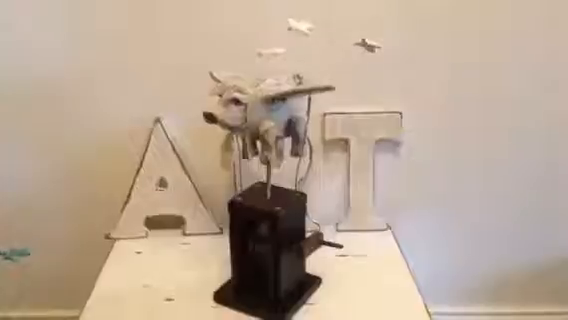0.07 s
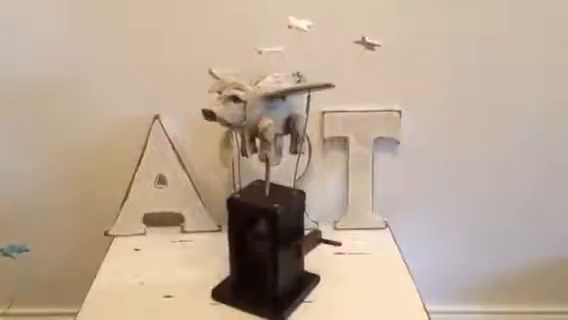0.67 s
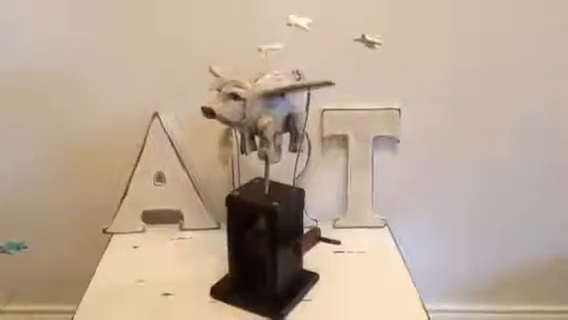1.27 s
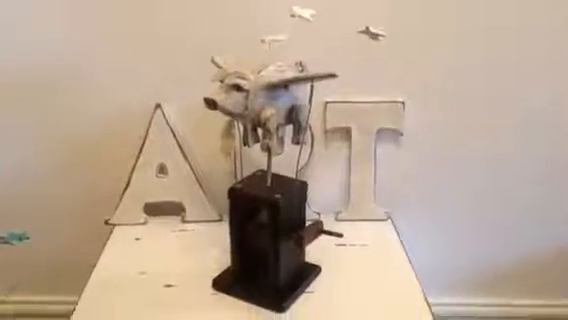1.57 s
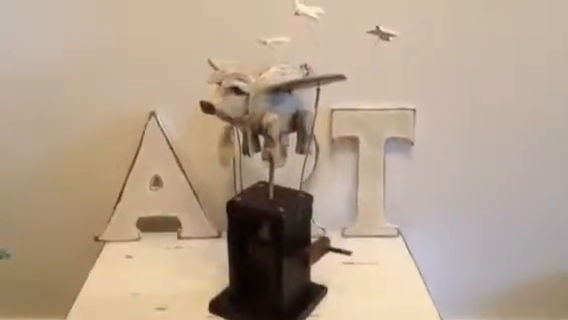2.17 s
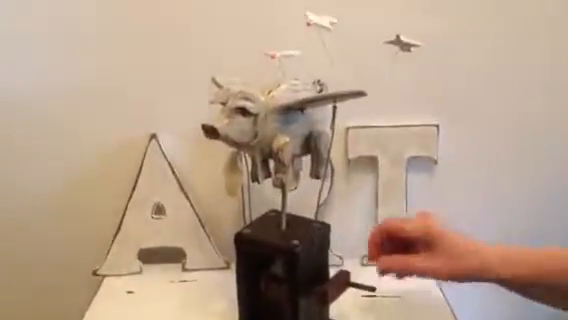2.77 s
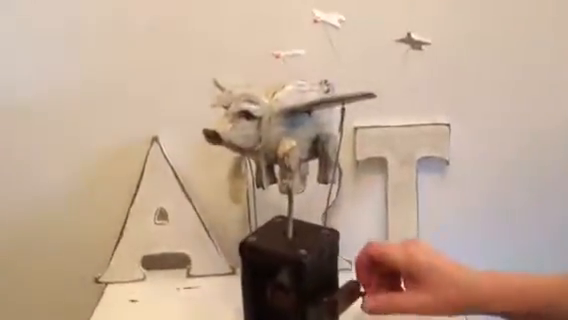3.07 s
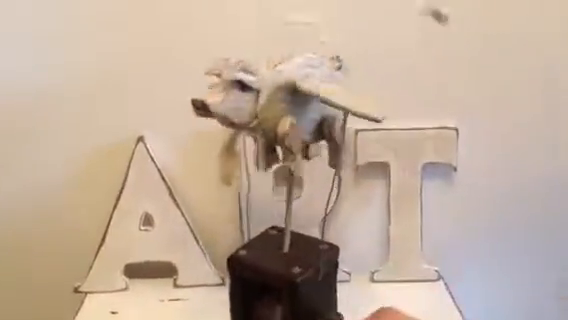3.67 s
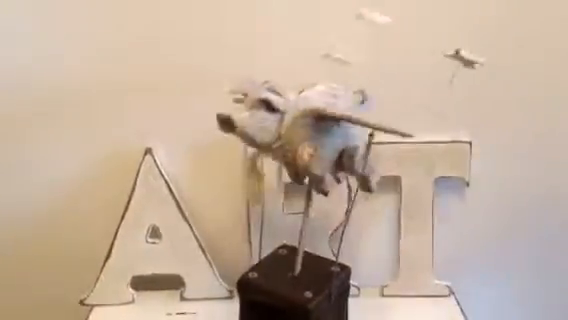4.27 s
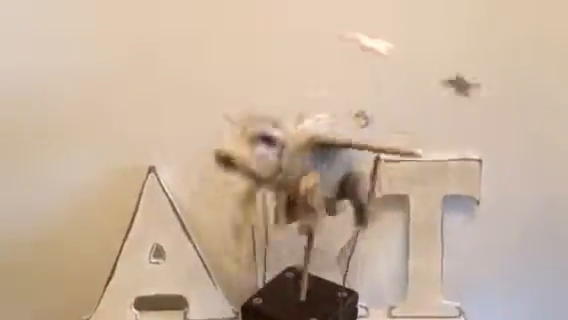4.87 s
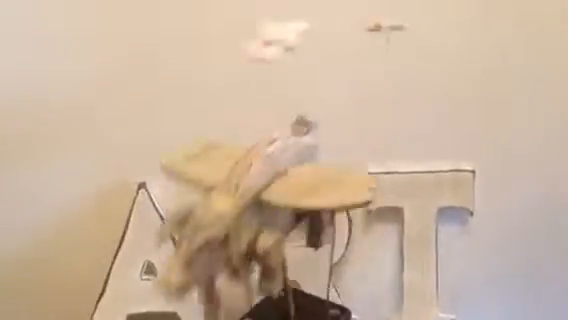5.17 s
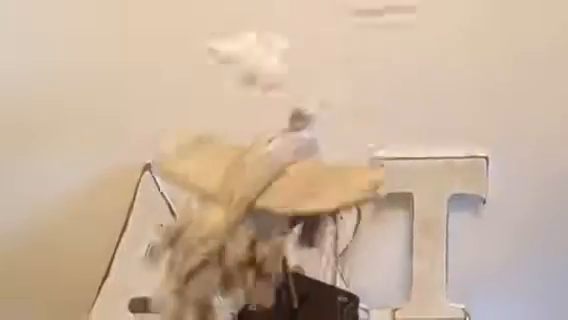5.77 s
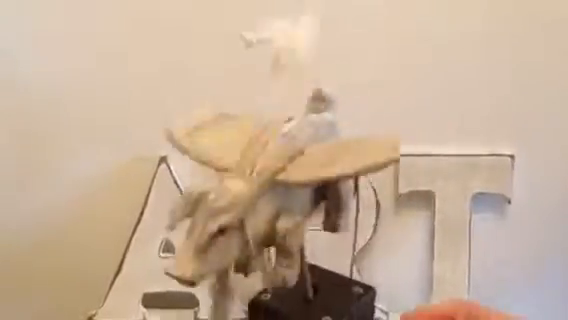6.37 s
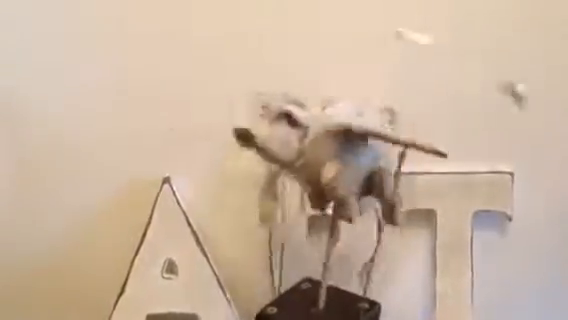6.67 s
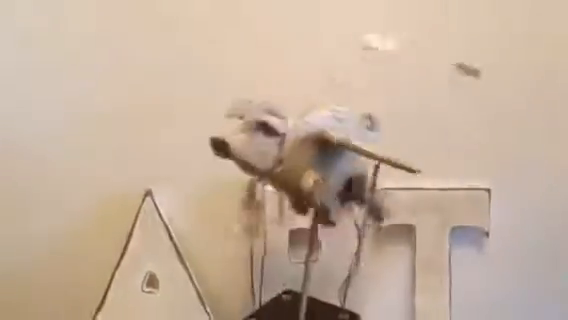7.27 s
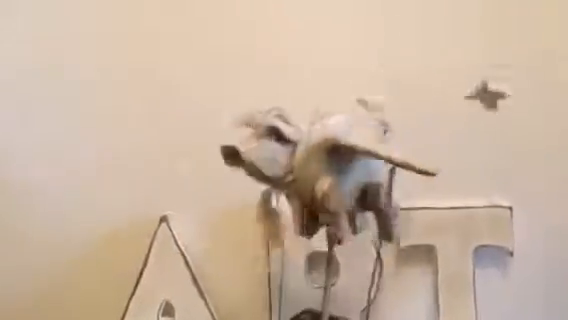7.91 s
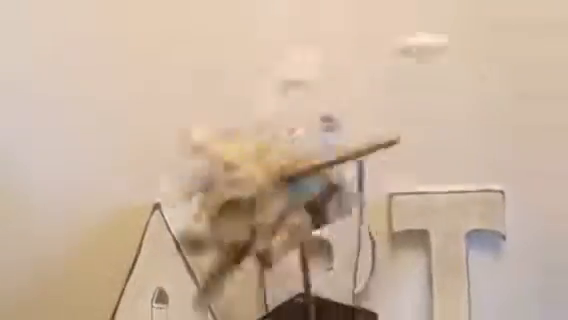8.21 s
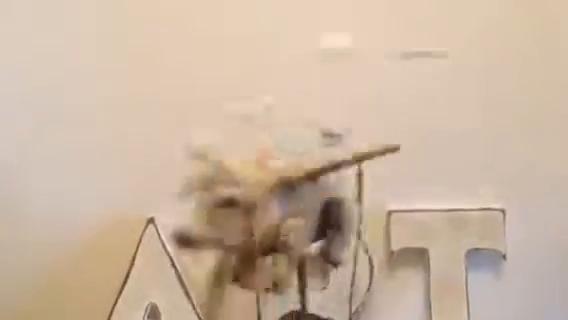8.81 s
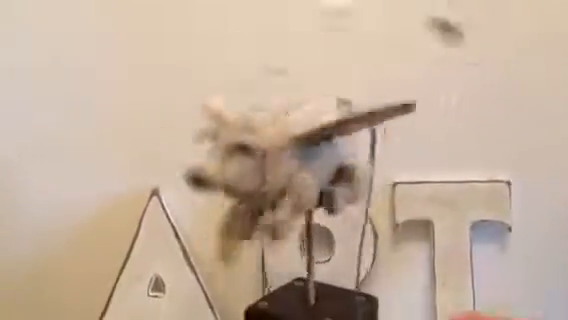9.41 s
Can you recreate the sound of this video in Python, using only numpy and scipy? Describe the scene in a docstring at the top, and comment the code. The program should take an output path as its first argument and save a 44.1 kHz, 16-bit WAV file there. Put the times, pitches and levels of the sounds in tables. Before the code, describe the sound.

A hand-cranked wooden toy scrapes into motion, then thumps, clacks and rattles in a steady, loose rhythm in a quiet room.

```python
"""A hand-cranked wooden flying pig

The toy stands on a box on a table in a quiet room. Something clinks far off, someone shifts closer,
and a sleeve rustles as the hand reaches for the crank. Each turn tips, drops and lifts the figure:
the box thumps on the table, the shaft scrapes in its wooden bearings, a dry pivot squeaks, and the
push rods and wires clack, tick and snap in their holes."""
import sys
import numpy as np
from scipy import signal
from scipy.fft import rfft, irfft, next_fast_len
from scipy.io import wavfile
from scipy.ndimage import map_coordinates

SR = 44100
rng = np.random.default_rng(int(sys.argv[2]) if len(sys.argv) > 2 else 0)


def digitize_waveform(pressure):
    """Quantize a signal to 16-bit integers and store it at the path in sys.argv[1].

    Rows of a 2-D input are taken as channels; values are limited to [-1, 1].
    """
    field = np.atleast_2d(pressure).T
    bounded = np.clip(field, -1, 1)
    quanta = np.round(bounded * 32767).astype(np.int16)
    wavfile.write(sys.argv[1], SR, quanta)


N = 416744
NOW = np.arange(N) / SR  # seconds since the scene began
RING = np.arange(SR // 3) / SR  # seconds since a blow


# the tones the box rings with on the table: pitch_hz, level_db, fade_s
BOX_TONES = [(77, 0, 0.33), (103.3, 5, 0.17), (169, -21, 0.15), (177, -13, 0.42), (214.2, 3.5, 0.13),
             (280, -20, 0.33), (338, -7, 0.11), (358, 0, 0.083), (429.5, 0.5, 0.023), (456, -15, 0.023),
             (548, -12.5, 0.089), (676, -8.5, 0.068), (685, -11.5, 0.06), (909, -11.5, 0.056)]
# the figure's weight jolts the box: peak_s, level_db, pitch_hz
BOX_THUMPS = [(3.104, -53, 172), (3.174, -53.5, 158), (3.253, -48, 167), (3.376, -45.5, 165),
              (3.472, -50.5, 137), (3.563, -47, 160), (3.831, -43, 163), (3.876, -39, 156),
              (4.034, -35, 164.5), (4.094, -38, 128), (4.236, -31.5, 184), (4.558, -36.5, 148),
              (4.687, -35, 173), (4.735, -31.5, 155), (4.903, -42, 188), (5.192, -35.5, 155),
              (5.299, -30, 178), (5.334, -32.5, 169), (5.359, -33, 153), (5.494, -34, 173),
              (5.865, -27.5, 183), (5.881, -23.5, 156), (5.946, -33, 172.4), (6.021, -31.5, 171),
              (6.077, -32.5, 152), (6.348, -30.5, 153), (6.459, -20, 173.5), (6.571, -34, 206),
              (6.677, -35.5, 148), (6.867, -31, 163), (7.02, -19, 170.5), (7.063, -29.5, 172),
              (7.13, -32, 181), (7.199, -32, 165), (7.477, -34, 133), (7.563, -31, 176), (7.618, -29, 168),
              (7.804, -41.5, 160), (8.088, -34, 136), (8.215, -21.5, 180.3), (8.413, -35, 187),
              (8.63, -33.5, 157), (8.772, -28.5, 198), (8.79, -24.5, 175), (8.987, -28, 160),
              (9.237, -42.5, 165), (9.347, -29, 170), (9.37, -27, 145), (9.424, -38, 152)]

def box_thumps(rise_s=0.0087, fall_s=0.0081, sag=0.1, shudder_db=1.5, box_db=-8, octave_db=-15):
    """Each drop of the figure swells into a shudder that sags in pitch, and sets the box ringing."""
    out, t = np.zeros(N), RING - RING[-1] / 2
    for peak_s, db, hz in BOX_THUMPS:
        swell = np.exp(-np.hypot(t, .004) / np.where(t < 0, rise_s, fall_s))
        cycles = np.cumsum(hz * (1 - sag * np.tanh(t / 0.0088))) / SR
        angle = 2 * np.pi * (cycles - cycles[len(t) // 2])
        # the table pushes back one way only, which adds the octave
        shudder = np.cos(angle) + amp(octave_db) * np.cos(2 * angle)
        add(out, peak_s + t[0], amp(db + shudder_db) * peaked(swell * shudder))
        landing = ring(BOX_TONES, detune=0.0081) * fade_in(0.0015)
        add(out, peak_s - 0.0021, -amp(db + box_db) * peaked(landing))
    return out


# the tones the linked rods ring with: pitch_hz, level_db, fade_s
ROD_TONES = [(885, -11, 0.046), (1170, 11.5, 0.0048), (1595, 5.5, 0.0094), (1911, -7, 0.035),
             (2094, 0.5, 0.011), (2547, -3, 0.034), (3060, -9.5, 0.034), (3040, 0.5, 0.019),
             (3390, -8.5, 0.014), (3540, -5, 0.017), (4330, -19, 0.025)]
# the tone colour of a crack on wood: pitch_hz, level_db
CRACK_COLOUR = [(150, -18), (500, 9), (1000, -9), (1700, 17), (2250, 3), (3300, 6.5), (5000, -6),
                (8000, -11), (16000, -38)]
# the tone colour of the bright fizz of rods and wires: pitch_hz, level_db
FIZZ_COLOUR = [(2000, -16), (5000, -3), (7100, 0), (8200, -4.5), (9500, -1.5), (10400, -9), (11800, 1.5),
               (13000, -8.5), (16000, -3.5)]
# rods and wing joints knock: start_s, level_db, strongest_hz, treble_db
ROD_CLACKS = [(3.564, -46, 1480, -4), (4.044, -44, 1800, 1.5), (4.1896, -43.5, 1860, -3),
              (4.22, -33, 1940, -25), (5.0475, -41.5, 2550, -28), (5.2835, -36.5, 1520, -26),
              (5.534, -38, 2510, -9), (5.6461, -31.5, 2550, -22), (5.6994, -41, 1810, -13),
              (5.824, -34.5, 2010, -29), (5.876, -40.5, 1240, -15), (5.911, -34, 3480, -10),
              (6.069, -36.5, 890, -24), (6.1626, -43, 2160, -28), (6.3272, -28.5, 1640, -7),
              (6.4573, -34, 1340, -5), (6.4873, -32.5, 2780, -8), (6.602, -47, 2000, -22),
              (6.6128, -37, 1590, -22), (6.7045, -41.5, 3170, -26), (6.773, -34, 2610, -11),
              (6.9332, -40, 1930, -24), (6.9663, -39, 1950, -17), (6.991, -38.5, 2080, -2.5),
              (7.0106, -39.5, 3520, -26), (7.0173, -32, 1290, -28), (7.0273, -34.5, 2000, -26),
              (7.1768, -38, 2050, -31), (7.228, -38, 1890, -19), (7.2844, -36, 2550, -35),
              (7.3507, -32.5, 2540, -27), (7.5493, -42.5, 1360, -21), (7.6082, -40.5, 2180, -25),
              (7.8446, -40.5, 1270, -27), (8.159, -38, 2080, -16), (8.226, -40, 3330, -25),
              (8.4016, -38.5, 1960, -8), (8.446, -33.5, 1860, -30), (8.4913, -27.5, 2570, -35),
              (8.758, -44, 1320, -5), (8.797, -37, 1530, -25), (8.9282, -37, 2100, -13),
              (9.1406, -40, 2710, -28), (9.3092, -33, 1930, -30), (9.3268, -33, 2550, -10),
              (9.362, -32.5, 3430, -26), (9.3829, -34.5, 1210, -27)]

def rod_clacks(focus_db=9, linger=0.48, crack_db=-13, treble_db=-6, level_db=-2):
    """A rod knocks on wood with a crack and a fizz; tones hit squarely ring louder and longer."""
    out = np.zeros(N)
    tone_hz, tone_db, fade_s = np.transpose(ROD_TONES)
    for start_s, db, hz, treble in ROD_CLACKS + loose_rod_knocks():
        squarely = np.exp(-(np.log2(tone_hz / hz) / .13) ** 2)
        tones = np.transpose([tone_hz, tone_db + focus_db * squarely, fade_s * (1 + linger * squarely)])
        blow = struck(ring(tones, detune=0.0042)) + amp(crack_db) * burst(CRACK_COLOUR, 0.033)
        blow = struck(blow * fade_in(.0012))
        fizz = amp(treble + treble_db) * struck(burst(FIZZ_COLOUR, 0.035))
        add(out, start_s + 0.001064, amp(db + level_db) * (blow + fizz))
    return out


def loose_rod_knocks(per_s=7, over_scrape_db=13, spread_db=2, ceiling_db=-42, treble_db=-18):
    """Loose rods knock at random, harder when the bearings are loaded. Gives rows like ROD_CLACKS."""
    chances = rng.random((200, 4))
    scrape, rows = friction(SCRAPE), []
    span_s = NOW[-1] - FULL_SPEED_S
    for when, kept, size, pitch in chances:
        if kept < per_s * span_s / len(chances):
            start_s = FULL_SPEED_S + when * span_s
            db = min(20 * np.log10(scrape[int(start_s * SR)]) + over_scrape_db, ceiling_db)
            hz = ROD_TONES[int(pitch * len(ROD_TONES))][0]
            rows.append((start_s, db + spread_db * (2 * size - 1), hz, treble_db))
    return rows


# the tones the wire link rings with: pitch_hz, level_db, fade_s
WIRE_TONES = [(1610, 0, 0.031), (2170, 8, 0.02), (3090, 9, 0.032), (3580, 7, 0.026), (4380, 10, 0.007),
              (6300, -13, 0.11), (9340, 7, 0.0095), (9960, -22, 0.012), (10000, -16, 0.055),
              (10860, -5, 0.023), (11700, -33, .015), (14000, -3, 0.021), (16000, -12, .025)]
# the wire link catches and snaps free: start_s, level_db, treble_db
WIRE_SNAPS = [(4.3342, -27, 3.5), (4.6845, -40, -10), (5.0962, -31, -2), (5.2968, -37.5, -5),
              (5.5725, -34.5, -1.5), (8.1959, -32.5, -2)]

def wire_snaps(crack_db=-7, treble_db=5, level_db=1):
    """A wire jumps in its hole: a hard tick and a thin metallic ring."""
    out = np.zeros(N)
    is_high = np.transpose(WIRE_TONES)[0] > 6000
    for start_s, db, treble in WIRE_SNAPS:
        metal = struck(ring(WIRE_TONES, is_high * (treble + treble_db), scatter_db=4, detune=0.013))
        crack = amp(crack_db + treble + treble_db) * burst(FIZZ_COLOUR, 0.01)
        add(out, start_s + .0005, amp(db + level_db) * struck((metal + crack) * fade_in(0.00019)))
    return out


# small dry ticks, most of them from the wires: start_s, level_db, pitch_hz
WIRE_TICKS = [(2.3205, -51.5, 6900), (3.8762, -46, 6840), (4.1643, -50, 12100), (5.184, -44, 10900),
              (5.67, -48, 7100), (5.7485, -46.5, 6140), (5.9993, -44, 12300), (6.883, -45.5, 6250),
              (7.0384, -42, 12600), (7.452, -48, 6500), (7.578, -46.5, 9300), (8.08, -46, 11100),
              (9.2244, -45.5, 6400)]

def wire_ticks(fade_s=0.042, level_db=-1):
    """Light touches make short, bright bursts of noise."""
    out = np.zeros(N)
    for start_s, db, hz in WIRE_TICKS:
        colour = [(hz / 4, -16), (hz / 2, -10), (hz, 0), (hz * 2, -13)]
        add(out, start_s + 0.00092, amp(db + level_db) * peaked(burst(colour, fade_s)))
    return out


# the tone colour of wood scraping on wood: pitch_hz, level_db
SCRAPE_COLOUR = [(150, -28), (400, 6), (650, 7), (780, 2.5), (930, 8), (1150, -2.5), (1900, 2.5),
                 (2350, -0.5), (3400, -5), (4800, -13.5), (7000, -44.5), (15000, -37)]
# the tone colour of the shuddering box: pitch_hz, level_db
SHUDDER_COLOUR = [(35, -53), (70, -9), (102, -9), (120, 1), (155, 2), (190, 5), (250, -33), (345, -11.5),
                  (500, -20.5), (900, -27.5), (2000, -67)]

def crank(weight_scrape_db=-38, box_ring_db=-2, rod_ring_db=-9):
    """Shaft and rods slip in their bearings: the wood scrapes, the wires hiss and the box shudders."""
    slips, jolts = grains(per_s=2000, spread_db=3.6), grains(per_s=900, spread_db=1.5)
    rods = evened(signal.oaconvolve(slips, ring(ROD_TONES))[:N])
    wood = coloured(slips, SCRAPE_COLOUR) + amp(rod_ring_db) * rods
    wood = wandering_contact(wood, depth_db=9.5, patch_s=.018)
    wires = coloured(slips + grains(per_s=2500, spread_db=1), FIZZ_COLOUR)
    wires = wandering_contact(wires, depth_db=7, patch_s=.035)
    panels = evened(signal.oaconvolve(jolts, ring(BOX_TONES, scatter_db=4.5, detune=0.0018))[:N])
    rumble = coloured(grains(per_s=800, spread_db=-1), SHUDDER_COLOUR)
    box = evened(rumble + amp(box_ring_db) * panels)
    box *= judder(depth_db=6.5, step_s=.03)
    wood *= judder(depth_db=4, step_s=.009)
    wires *= judder(depth_db=2, step_s=.025)
    wood_level = np.hypot(friction(SCRAPE), amp(weight_scrape_db) * weight_on_bearings())
    return friction(SHUDDER) * box + wood_level * wood + friction(HISS) * wires


SHUDDER, SCRAPE, HISS = range(3)  # the three layers of the crank's sound
GRIP_S, GRIP_RISE_S, FULL_SPEED_S = 3.026, 0.042, 4.6  # the hand takes hold, then winds up to speed
# steady rubbing, one row for each layer: full_speed_db, quieter_when_slow_db
STEADY_FRICTION = [(-55.5, 9), (-64, 14), (-72, 9)]

def friction(layer):
    """How loud one layer is: steady rubbing that grows with speed, plus the strokes of each turn."""
    full_db, quieter_db = STEADY_FRICTION[layer]
    speed = np.clip((NOW - GRIP_S) / (FULL_SPEED_S - GRIP_S), 0, 1)
    held = np.clip((NOW - GRIP_S) / GRIP_RISE_S, 0, 1)
    return held * np.hypot(amp(full_db - quieter_db * (1 - speed)), strokes(layer))


# when the figure is lowest in each turn, and how hard each stroke is: lowest_s, tip_db, drop_db, lift_db
CRANK_TURNS = [(3.6, -17, -15, -7.5), (4.221, -3, -8, -21), (4.719, 0.5, -3, -12), (5.32, 0.5, -9, 1),
               (5.873, 0.5, 0.5, 3), (6.458, 4.5, 2, -1.5), (7.02, 4.5, 1, 0.5), (7.6, 1, -2, -4),
               (8.223, 4, 2, 2.5), (8.778, 3, 1.5, 2.5), (9.351, 3, -0.5, 12.5)]
# the tip, the drop and the lift: delay_turns, half_width_turns, shudder_db, scrape_db, hiss_db
TURN_STROKES = [(-.23, 0.071, -48.5, -69, -73), (-.03, 0.059, -42, -53, -66),
                (0.332, .11, -47.5, -61, -73.5)]

def strokes(layer, turn_s=0.62):
    """Every turn presses on the bearings three times, as the figure tips, drops and is lifted."""
    power, t = np.zeros(N), np.arange(-SR // 4, SR // 4) / SR
    for lowest_s, *forces in CRANK_TURNS:
        for force_db, (delay, width, *levels) in zip(forces, TURN_STROKES):
            swell = np.exp(-(t / (width * turn_s)) ** 2)
            add(power, lowest_s + delay * turn_s + t[0], amp(force_db + levels[layer]) ** 2 * swell)
    return np.sqrt(power)


def weight_on_bearings(lead_s=0.0059, spread_s=0.019, follow=0.74):
    """The force on the bearings peaks as the figure's weight comes down, just before each thump."""
    force, t = np.zeros(N), RING - RING[-1] / 2
    for peak_s, db, _ in BOX_THUMPS:
        add(force, peak_s - lead_s + t[0], amp(follow * db) * np.exp(-(t / spread_s) ** 2))
    return force


def judder(depth_db, step_s):
    """The shaft catches and lets go unevenly, so its rubbing comes in lumps."""
    catches = rng.uniform(-1, 1, 4000)
    return evened(amp(depth_db * np.interp(NOW / step_s, np.arange(len(catches)), catches)))


def wandering_contact(x, depth_db, patch_s, patch_octaves=.16):
    """The rubbing spot wanders, so now one range of pitches stands out and now another."""
    hz, t, spectrum = signal.stft(x, SR, nperseg=512, noverlap=384)
    place = np.meshgrid(np.log2(1 + hz / 500) / patch_octaves, t / patch_s, indexing="ij")
    patches = map_coordinates(rng.standard_normal((64, 800)), place, order=1, mode="mirror")
    spectrum *= amp(depth_db * np.tanh(patches))
    return evened(signal.istft(spectrum, SR, nperseg=512, noverlap=384)[1][:N])


# a joint drags for an instant and sings faintly: middle_s, length_s, level_db, pitch_hz
JOINT_RUBS = [(3.045, .07, -76, 9200), (3.29, .056, -71.5, 3570), (3.376, .06, -74.5, 3520),
              (3.566, .053, -66, 600), (3.648, 0.14, -67.5, 3240), (3.717, 0.036, -63.5, 1120),
              (3.718, 0.041, -63, 430), (3.89, 0.18, -69, 7100), (4.244, .06, -54, 1950),
              (6.084, 0.029, -51, 890), (7.403, 0.042, -58.5, 890), (7.757, 0.056, -51, 1000),
              (8.287, 0.025, -53.5, 1170), (8.445, .035, -50, 1810), (8.62, .041, -53.5, 905)]

def joint_rubs(width_ratio=1.34):
    """Brief rubbing in a joint stirs up a broad band of noise around one pitch."""
    out = np.zeros(N)
    for middle_s, length_s, db, hz in JOINT_RUBS:
        colour = [(hz / 4, -35), (hz / width_ratio, -15), (hz, 0), (hz * width_ratio, -15), (hz * 4, -40)]
        swell = signal.windows.hann(round(length_s * SR))
        drag = evened(coloured(rng.standard_normal(len(RING)), colour)[:len(swell)])
        add(out, middle_s - length_s / 2, amp(db) * swell * drag)
    return out


# a dry pivot chirps: middle_s, length_s, level_db, pitch_hz
PIVOT_SQUEAKS = [(5.179, 0.011, -46.5, 1544), (7.456, 0.016, -43.5, 1550), (5.7, .025, -49, 1550)]

def pivot_squeaks(sag=0.074):
    """A pivot sticks and slips a few dozen times, making a tone that sags in pitch."""
    out = np.zeros(N)
    for middle_s, length_s, db, hz in PIVOT_SQUEAKS:
        swell = signal.windows.hann(round(length_s * SR))
        cycles = np.cumsum(hz * (1 - sag * np.linspace(-1, 1, len(swell)))) / SR
        add(out, middle_s - length_s / 2, amp(db) * swell * np.sin(2 * np.pi * cycles))
    return out


# soft bumps of someone shifting closer: start_s, level_db, treble_db
FLOOR_BUMPS = [(1.569, -64.5, 12), (2.16, -51.5, -6), (2.205, -57, -14), (2.469, -58, 6), (2.625, -53, -3),
               (2.715, -57, -9), (2.885, -55, -16)]

def floor_bumps(fade_s=0.22, rise_s=0.0053):
    """Padded, dull knocks come through the floor."""
    out = np.zeros(N)
    for start_s, db, treble in FLOOR_BUMPS:
        colour = [(50, 2.5), (160, 4.5), (300, -2.5),
                  (500, treble - 10), (1000, treble - 11), (2500, treble - 22), (8000, -55)]
        add(out, start_s, amp(db) * peaked(burst(colour, fade_s) * fade_in(rise_s)))
    return out


# the tone colour of sliding cloth: pitch_hz, level_db
CLOTH_COLOUR = [(100, -10), (400, -5), (1000, -0.5), (2500, -5), (4000, -5.5), (6500, -9), (9000, -10),
                (11000, -14), (16000, -15)]
# the arm comes forward, then reaches for the crank: middle_s, half_length_s, level_db
ARM_MOVES = [(2.07, 0.19, -70.5), (2.65, 0.3, -73)]

def sleeve():
    """Cloth slides softly, swelling and fading with each move of the arm."""
    power = sum(amp(db) ** 2 * np.exp(-((NOW - s) / half_s) ** 2) for s, half_s, db in ARM_MOVES)
    return np.sqrt(power) * coloured(grains(per_s=5100, spread_db=1.5), CLOTH_COLOUR)


# the tones of a small, hard object: pitch_hz, level_db, fade_s
CLINK_TONES = [(574, -2, 0.11), (1250, -10, .12), (1973, 7, 0.096), (2080, -4, 0.1), (2580, -31, 0.13),
               (3400, -1, 0.1), (4060, -4, 0.11), (6000, -4, 0.063)]

def distant_clink(start_s=.115, level_db=-54.5, rattle_db=-9):
    """Something hard is touched farther off in the room; it rings and rattles softly."""
    out = np.zeros(N)
    colour = [(300, -10), (600, -2), (1200, -4), (2000, -1), (4200, -6), (7000, -13), (16000, -25)]
    rattle = amp(rattle_db) * burst(colour, 0.2)
    touch = peaked(ring(CLINK_TONES)) + rattle
    add(out, start_s, amp(level_db) * peaked(touch * fade_in(0.0037)))
    return out


# how long the room's echo lasts: pitch_hz, fade_s
ECHO_FADES = [(100, 0.4), (300, 0.45), (1000, 0.22), (4000, 0.32), (15000, 0.17)]

def room_echo(x, patterns=3, echoes_per_s=3000):
    """Wall echoes lose their treble first; several patterns slowly blend, so the tail sounds even."""
    out, size = np.zeros(N), SR // 2
    for k in range(patterns):
        echoes = rng.choice([-1., 1.], size) * (rng.random(size) < echoes_per_s / SR)
        echoes *= np.arange(size) > .003 * SR  # the first echo takes a moment to arrive
        hz, t, spectrum = signal.stft(echoes, SR, nperseg=256)
        spectrum *= np.exp(-np.log(1000) * t / look_up(ECHO_FADES, hz)[:, None])
        tail = signal.istft(spectrum, SR, nperseg=256)[1]
        share = np.sqrt(2 / patterns) * np.cos(np.pi * (NOW + k / patterns))
        out += signal.oaconvolve(x * share, tail / np.linalg.norm(tail))[:N]
    return out


# the tone colour of the quiet room: pitch_hz, level_db
AIR_COLOUR = [(12, -59), (20, -20), (49, 2.5), (70, -11), (104, -0.5), (127, -16), (172, -10.5),
              (347, -21.5), (499, -30), (574, -27), (849, -31), (1960, -35), (2990, -37.5), (8410, -42),
              (16000, -48.5)]

def room_air(level_db=-63):
    """The still air of the room is a faint, low, steady noise."""
    return amp(level_db) * coloured(rng.standard_normal(N), AIR_COLOUR)


def ring(tones, boost_db=0, scatter_db=2, detune=0.018):
    """A struck object rings; each blow lands differently, nudging every tone's level and pitch."""
    hz, db, fade_s = np.transpose(tones)
    share, shift = rng.standard_normal((2, len(hz)))
    height = amp(db + boost_db + scatter_db * share) * (-1) ** np.arange(len(hz))
    waves = np.sin(2 * np.pi * (hz * (1 + detune * shift))[:, None] * RING)
    return height @ (waves * fade_out(fade_s[:, None]))


def burst(colour, fade_s):
    """The crowd of small tones in a blow: noise that dies quickly."""
    return coloured(rng.standard_normal(len(RING)), colour) * fade_out(fade_s)


def grains(per_s, spread_db):
    """Tiny slips of rubbing surfaces: random clicks of uneven size."""
    size = amp(spread_db * np.minimum(rng.exponential(1, N), 4)) * rng.choice([-1, 1], N)
    return evened(size * (rng.random(N) < per_s / SR))


def coloured(x, colour):
    """Makes each pitch in x as strong as the colour table says, then evens the result."""
    size = next_fast_len(len(x))
    gain = amp(look_up(colour, np.fft.rfftfreq(size, 1 / SR)))
    return evened(irfft(rfft(x, size) * gain, size)[:len(x)])


def look_up(table, hz):
    """Reads between a table's rows, with pitch spaced in octaves."""
    row_hz, value = np.transpose(table)
    return np.interp(np.log(hz + 1), np.log(row_hz + 1), value)


def fade_in(rise_s):
    """Softens the start of a blow."""
    return 1 - np.exp(-RING / rise_s)


def fade_out(fade_s):
    """Dies away by 60 dB in fade_s."""
    return np.exp(-np.log(1000) * RING / fade_s)


def amp(db):
    """Turns decibels into a multiplier."""
    return 10 ** (np.asarray(db) / 20)


def evened(x):
    """Scales to an average (rms) level of 1."""
    return x / np.sqrt(np.mean(x ** 2) + 1e-20)


def peaked(x):
    """Scales to a peak of 1."""
    return x / (abs(x).max() + 1e-20)


def struck(x, attack_s=.004, peak_ratio=2.7):
    """Scales a blow by the strength of its first milliseconds, so that it peaks near 1."""
    return x / (peak_ratio * np.sqrt(np.mean(x[:round(attack_s * SR)] ** 2)))


def add(mix, start_s, sound):
    """Mixes a sound in at start_s."""
    part = mix[max(round(start_s * SR), 0):][:len(sound)]
    part += sound[:len(part)]


def scene():
    """The toy close by, its echo, and the quiet sounds around it."""
    low = box_thumps() + floor_bumps()
    sharp = rod_clacks() + wire_snaps() + wire_ticks()
    soft = crank() + joint_rubs() + pivot_squeaks() + distant_clink()
    echo = room_echo(amp(-9.5) * low + amp(-11) * sharp + amp(-11.5) * soft)
    return (low + sharp + soft + echo + room_air() + sleeve())[None]


def record(dry, silent_s=.075, top_hz=15900):
    """The sound comes in after a moment of silence, with the very highest treble cut off."""
    opened = np.clip((NOW - silent_s) / .01, 0, 1)
    low_pass = signal.firwin(511, top_hz, window=("kaiser", 9), fs=SR)
    return signal.oaconvolve(dry * opened, low_pass[None], "same")


dry = scene()
out = record(dry)
digitize_waveform(out)
```